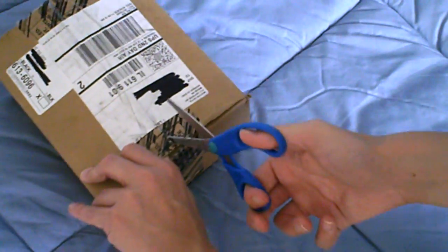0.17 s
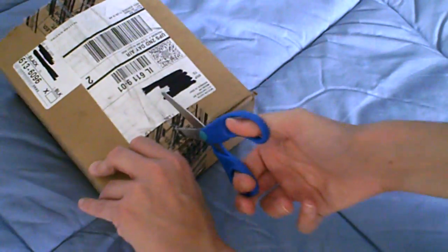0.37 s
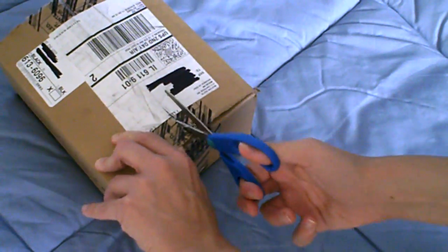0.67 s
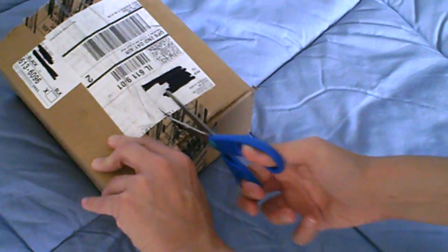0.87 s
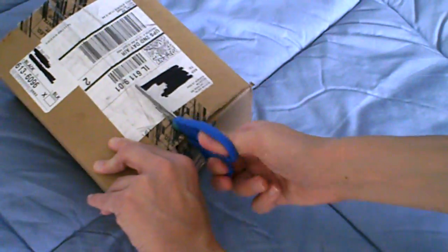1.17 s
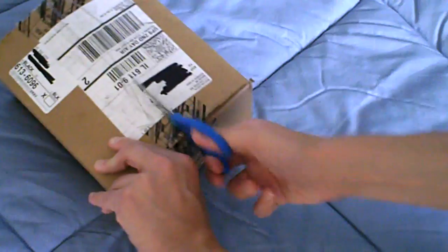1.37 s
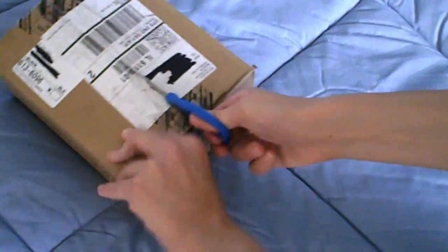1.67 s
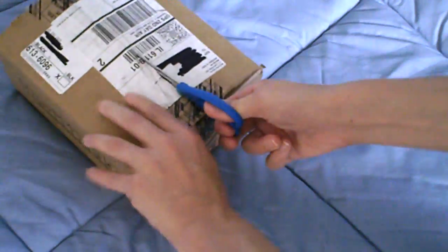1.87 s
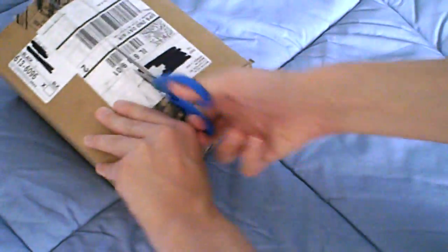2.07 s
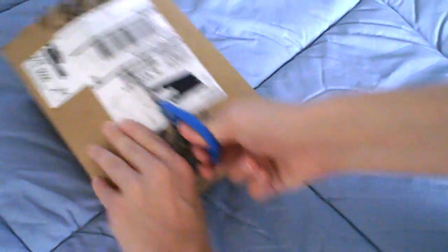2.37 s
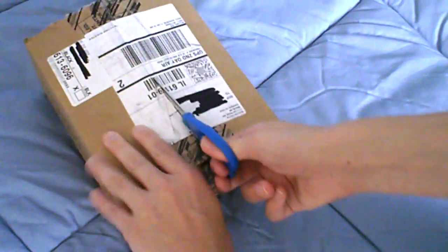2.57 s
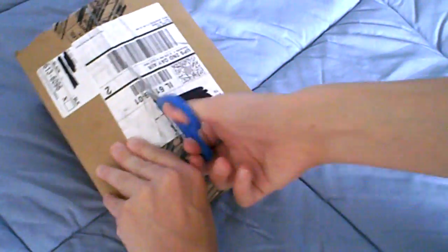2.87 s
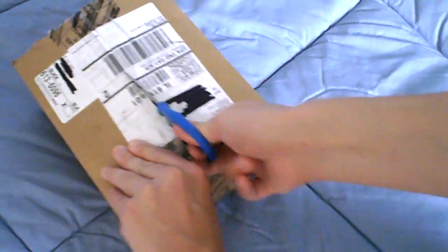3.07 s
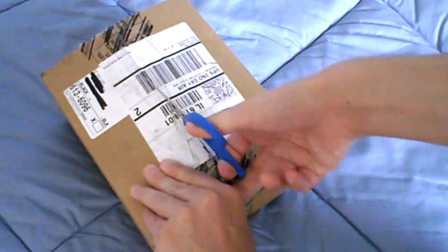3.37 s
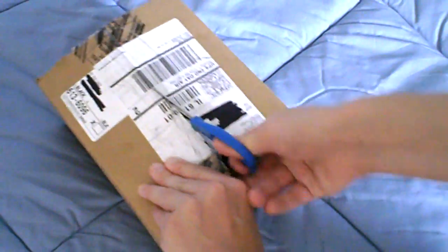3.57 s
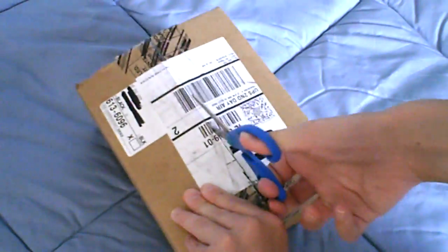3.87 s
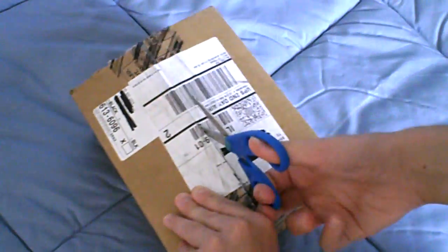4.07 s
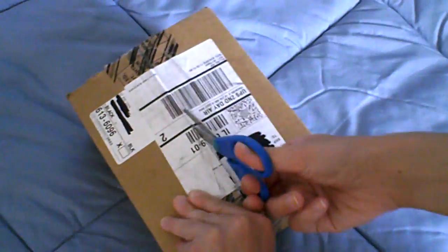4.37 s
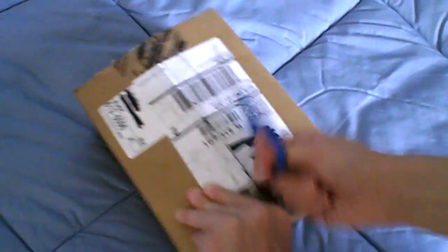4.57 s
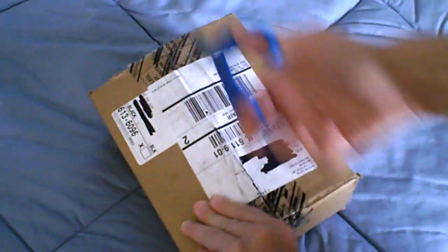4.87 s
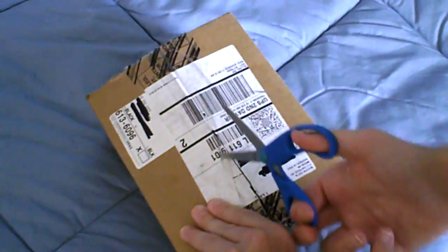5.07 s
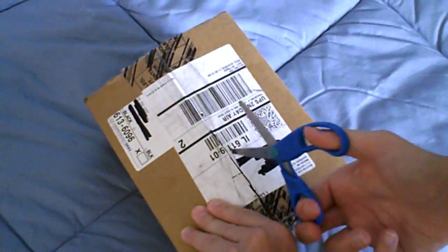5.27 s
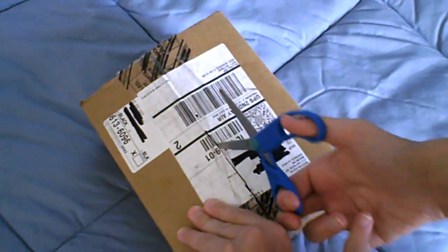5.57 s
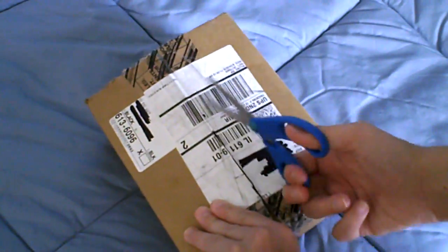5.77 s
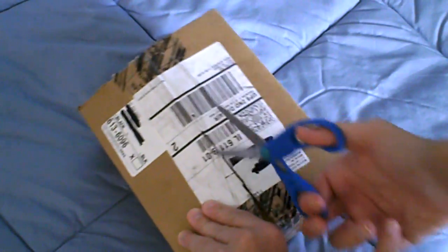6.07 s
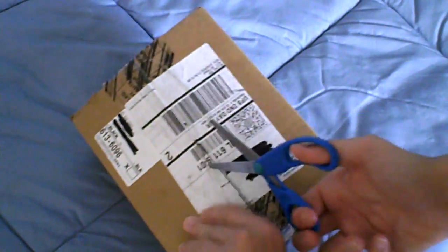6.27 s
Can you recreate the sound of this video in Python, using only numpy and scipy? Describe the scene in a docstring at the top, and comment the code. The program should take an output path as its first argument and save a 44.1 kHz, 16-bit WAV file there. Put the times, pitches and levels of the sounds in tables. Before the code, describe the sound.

Close, uneven cutting at a cardboard box: short gritty pushes, crackling tape, hollow thumps, a sharp blade crunch, then sparse light scrapes.

```python
"""Scraping, crunching and hissing pushes with snaps and hollow knocks: scissors cut packing tape on a box.
The box lies on a bed in a small room. Random slips, filtered, make the rubbing, the tearing and the grating
blades; filtered bursts make the snaps, clinks, bumps and creak; swells of noise make the blades shear.
All of it rings the modes of the hollow box and the room, over a faint steady rush."""
import sys
import numpy as np
from scipy import signal
from scipy.fft import rfft, irfft, next_fast_len
from scipy.io import wavfile
from scipy.ndimage import uniform_filter1d, map_coordinates

SR = 44100
rng = np.random.default_rng(int(sys.argv[2]) if len(sys.argv) > 2 else 0)


def transcribe(u):
    """Save the signal u as a 16-bit wav file named by the first command-line argument.

    u: samples, shape (n,) or (channels, n), limited to [-1, 1]; the rate is SR.
    q: integer samples, one column per channel.
    """
    v = np.clip(np.atleast_2d(u).T, -1, 1)
    q = np.round(v * 32767).astype(np.int16)
    wavfile.write(sys.argv[1], SR, q)


N = 283254
TIME = np.arange(N) / SR  # the whole scene [s]
AGE = np.arange(SR // 2) / SR  # half a second from the onset of a sound [s]


def amp(db):
    """Decibels to gain."""
    return 10 ** (np.asarray(db) / 20)


def unit(x):
    """Scale to rms 1."""
    return x / np.sqrt(np.mean(x ** 2) + 1e-20)


def along(points, hz):
    """Read (Hz, value) points on a log frequency axis."""
    point_hz, value = np.transpose(points)
    return np.interp(np.log(hz + 1), np.log(point_hz), value)


def causal(gain_at, size=4096):
    """Minimum-phase impulse response with the given gain over frequency: its energy comes as early as possible."""
    log_gain = np.log(np.maximum(gain_at(np.fft.rfftfreq(size, 1 / SR)), 1e-6))
    cepstrum = irfft(log_gain)
    # fold the cepstrum onto positive time
    cepstrum[1:size // 2] *= 2
    cepstrum[size // 2 + 1:] = 0
    return irfft(np.exp(rfft(cepstrum)))


def through(x, response):
    """Convolve, keeping the length."""
    return signal.oaconvolve(x, response)[:len(x)]


def colour(points):
    """Impulse response of a (Hz, dB) spectrum."""
    return causal(lambda hz: amp(along(points, hz)))


def coloured(x, points):
    """Filter x through a (Hz, dB) spectrum."""
    return through(x, colour(points))


def resonance(centre_hz, q, order=1):
    """Impulse response of a broad resonance; a higher order steepens its skirts."""
    def gain_at(hz):
        detuning = (hz + 1) / centre_hz - centre_hz / (hz + 1)
        return (1 + (q * detuning) ** 2) ** (-order / 2)
    return causal(gain_at)


def ringing(modes):
    """Sum of damped modes, each (Hz, dB, t60 s), scaled to total energy 1."""
    ring = sum(amp(db - 60 * AGE / t60) * np.cos(2 * np.pi * hz * AGE) for hz, db, t60 in modes)
    return ring / np.linalg.norm(ring)


def add(track, s, sound):
    """Mix a sound in at time s."""
    start = max(round(s * SR), 0)
    track[start:start + len(sound)] += sound[:N - start]


def friction(per_second, spread_db, smooth):
    """Dry friction: random slips of uneven size on a share of smooth rubbing noise, rms 1."""
    happens = rng.random(N) < per_second / SR
    sign = rng.choice([-1, 1], N)
    size = amp(spread_db * np.minimum(rng.standard_normal(N), 2))
    slips = happens * sign * size
    return unit(unit(slips) + smooth * rng.standard_normal(N))


def burst(response, scatter, t60):
    """One release trailed by decaying noise, as of tearing fibres, through a response; rms 1 over 5 ms."""
    t = AGE[:len(response)]
    push = rng.standard_normal(len(t)) * amp(-60 * t / t60)
    push *= scatter / np.linalg.norm(push)
    push[0] += 1  # the release itself
    sound = through(push, response)
    return sound * np.sqrt(.005 * SR) / np.linalg.norm(sound)


def swell(s, spread_s):
    """A bell-shaped rise and fall around time s."""
    return np.exp(-.5 * ((TIME - s) / spread_s) ** 2)


def wobble(rate):
    """A smooth random curve with rate knots a second."""
    return map_coordinates(rng.standard_normal(int(N * rate / SR) + 4), [TIME * rate])


def effort(start, length, growth_db):
    """Gain of one push: it builds up, holds while the force grows or eases, and dies away."""
    attack_share, release_db_per_s = 0.24, 223
    age = TIME - start
    attack = np.sin(np.pi / 2 * np.clip(age / (attack_share * length), 0, 1))
    growth = growth_db * (np.clip(age / length, 0, 1) - .5)
    release = release_db_per_s * np.maximum(age - length, 0)
    return attack * amp(growth - release)


def contact(depth):
    """Gains of rubbing, crunch and hiss: a deeper blade shakes the box more and hisses less."""
    rub_db = -5 + 15 * depth
    hiss_db = -2.5 - 11 * depth
    return amp([[rub_db], [0], [hiss_db]])


def stroke():
    """With each push the blade rubs the card, crushes fibres and hisses along the tape."""
    # pushes of the blade: (start [s], length [s], level [dB], growth over the push [dB],
    # depth [0 skims the tape .. 1 digs into the card])
    pushes = [(0, 0.075, -69, -4, 0.64), (0.299, 0.14, -69.5, 8, 0.34), (0.45, 0.17, -66.5, -4, 0.36),
              (0.59, 0.069, -63.5, -1, 0.48), (0.739, 0.046, -60.5, 0, 0.27), (0.906, 0.055, -63.5, 6, .7),
              (0.955, 0.067, -60.5, 2, 0.13), (1.016, 0.16, -57, -4.5, 0.2),
              (1.172, 0.14, -58.5, 1.5, 0.57), (1.397, 0.074, -59, 2.5, 0.32),
              (1.499, 0.072, -56, 6.5, 0.36), (1.59, 0.072, -53, 0, 0.57), (1.718, 0.18, -66, -3, 0.16),
              (1.936, 0.14, -61, 0, 0.22), (2.085, 0.061, -64, -0.5, 0.77), (2.165, 0.062, -63, -2, 0.72),
              (2.258, 0.21, -58.5, -1, 0.62), (2.548, 0.11, -62.5, -4, .3), (2.685, 0.13, -61.5, 5, 0.52),
              (2.827, 0.098, -57.5, 3.5, 0.45), (2.956, .1, -58, 5, 0.55), (3.076, 0.057, -64, 8.5, 0.62),
              (3.15, 0.15, -61.5, 0.5, .15), (3.263, 0.095, -61, 2, 0.62),
              (3.482, 0.052, -52.5, -4.5, 0.65), (3.637, 0.24, -61.5, 6.5, 0.23),
              (3.89, .12, -68, 11, 0.52), (4.09, .14, -70.5, 9.5, 0.76), (4.255, 0.13, -63, -5, 0.59),
              (4.455, .19, -58, 5, 0.58), (4.678, 0.067, -58, -0.5, 0.28), (5.05, 0.22, -73.5, 0, 0.75),
              (5.301, 0.033, -64.5, -6, 0.96), (5.391, 0.063, -71.5, 3, 0.84),
              (5.488, 0.038, -65.5, 1, 0.74), (5.739, 0.059, -60.5, -3.5, .55),
              (6.052, 0.033, -65, 1, 0.74), (6.1, 0.29, -67, 6, 0.63), (6.355, 0.081, -60.5, 5, .75)]
    # spectrum of the box rubbed by the blade: (frequency [Hz], level [dB])
    rub_colour = [(40, -34), (90, -32.5), (135, -16), (200, -8.5), (290, -3), (390, -2), (560, 1.5),
                  (780, -1.5), (1150, 1.5), (1500, -13), (2500, -17), (6000, -62.5)]
    # spectrum of crushed fibres: (frequency [Hz], level [dB])
    fibre_colour = [(600, -72), (1200, -1), (1700, 6.5), (2300, 1), (3200, 0.5), (5000, -1), (7000, -14),
                    (14000, -51)]
    # spectrum of the blade sliding along the tape: (frequency [Hz], level [dB])
    slide_colour = [(2500, -28), (4500, -5), (5600, 0), (6500, -2), (7900, 0), (10200, -2), (12000, -11),
                    (16000, -25)]
    rest_db, rest_depth = -77.5, 0.68  # between pushes the hands and the blade never lie quite still
    tremor_db, tremor_per_s = 0.92, 25  # the force of the hand is unsteady

    power = (amp(rest_db) * contact(rest_depth)) ** 2
    for start, length, db, growth_db, depth in pushes:
        peak = amp(db) * contact(depth)
        power = power + peak ** 2 * effort(start, length, growth_db) ** 2
    rub_gain, crunch_gain, hiss_gain = np.sqrt(power) * amp(tremor_db * wobble(tremor_per_s))

    # now and then a stiffer fibre holds, then cracks through card and tape alike
    catches = friction(per_second=60, spread_db=0.5, smooth=0)
    rubbing = friction(per_second=350, spread_db=3.5, smooth=0.57)
    tearing = friction(per_second=900, spread_db=1.5, smooth=1.07)
    sliding = friction(per_second=4000, spread_db=7.5, smooth=0.83)
    rub = rub_gain * unit(coloured(rubbing + 0.17 * catches, rub_colour))
    crunch = amp(-3.5) * crunch_gain * unit(coloured(tearing + 0.59 * catches, fibre_colour))
    hiss = hiss_gain * unit(coloured(sliding + 0.25 * tearing + 0.18 * catches, slide_colour))
    return rub + crunch + hiss


def shifting(x, depth_db):
    """The colour wanders as the point of contact moves: smooth random gains over time and frequency."""
    spectrum = signal.stft(x, nperseg=512)[2]
    field = rng.standard_normal(spectrum.shape)
    field = uniform_filter1d(field, size=5, axis=0)  # across frequency
    field = uniform_filter1d(field, size=16, axis=1)  # across time
    return signal.istft(spectrum * amp(depth_db * unit(field)), nperseg=512)[1][:N]


def box_ring(blows, rubbing):
    """The modes of the hollow box ring, more for blows than for rubbing."""
    # modes of the hollow box: (frequency [Hz], level [dB], t60 [s])
    box_modes = [(133, -17, 0.33), (190.7, -2.5, 0.28), (301, -2.5, 0.1), (440, -14, 0.3), (504, -3, 0.12),
                 (571.6, -0.5, 0.24), (601, 6, 0.065), (672, -4, .2), (730, -11, .3), (770, -19, .17),
                 (943, -2, 0.29), (1106, -3, 0.13), (1114, -8, 0.09), (1300, 0, .15)]
    lift_s, set_down_s, lifted_db = 4.9, 6.2, -12  # scissors lifted clear: they ring the box less
    touching = amp(lifted_db * ((TIME > lift_s) & (TIME < set_down_s)))
    drive = amp(-22.0) * blows + amp(-26) * rubbing
    return through(touching * drive, ringing(box_modes))


def room(x, count=8):
    """Near walls answer with decaying noise; the echo pattern shifts as the hands and the box move."""
    # decay of the small room: (frequency [Hz], t60 [s])
    room_decay = [(150, 0.15), (600, 0.39), (2000, 0.16), (6000, 0.16), (14000, 0.079)]
    wet = np.zeros(N)
    for s in np.linspace(0, N / SR, count):
        hz, t, z = signal.stft(rng.standard_normal(len(AGE)), SR, nperseg=256)
        decay = amp(-60 * t / along(room_decay, hz)[:, None])
        tail = signal.istft(z * decay, SR, nperseg=256)[1][:len(AGE)]
        tail *= 1 - np.exp(-(AGE / 0.0043) ** 2)  # the echo builds up over a few ms
        # each tail crossfades into the next
        share = np.sqrt(np.maximum(1 - np.abs(TIME - s) * (count - 1) * SR / N, 0))
        wet += through(x * share, tail / np.linalg.norm(tail))
    return wet


def steady_rush():
    """A faint steady rush: coloured noise."""
    # spectrum of the rush: (frequency [Hz], level [dB])
    rush_colour = [(20, -29), (65, -29), (100, -18), (200, -4), (400, 2), (800, -4.5), (1500, -4.5),
                   (3000, -8.5), (8000, -16.5), (12000, -23), (16000, -25.5)]
    return amp(-68.5) * unit(coloured(rng.standard_normal(N), rush_colour))


def snaps():
    """Each snap cracks and ticks in the tape, knocks the lid and pushes the air in the box."""
    # tape and card giving way: (time [s], knock on the lid [dB], knock pitch [Hz],
    # crack in the tape [dB], crack pitch [Hz])
    snap_events = [(.038, -51.5, 1000, -67, 2200), (0.1032, -53, 900, -75, 2400),
                   (.4931, -58, 800, -70, 2160), (.617, -53, 1100, -47.5, 4000),
                   (0.7477, -58, 980, -64, 4700), (1.0277, -52, 670, -59.5, 4600),
                   (1.2052, -38.5, 590, -57, 3500), (1.2242, -43.5, 1070, -44.5, 3100),
                   (1.2629, -45, 555, -57, 3500), (1.2964, -49, 590, -53.5, 3600),
                   (1.4055, -70, 560, -57.5, 4470), (1.4371, -51.5, 615, -60, 4250),
                   (1.5188, -48, 647, -64, 2600), (1.53, -44.5, 700, -66, 2800),
                   (1.5846, -33.5, 583, -56, 2930), (1.6217, -44, 626, -58, 3800),
                   (1.9566, -54.5, 860, -48.5, 7750), (2.1676, -48, 640, -56.5, 3600),
                   (2.2181, -53, 615, -61, 3000), (2.2277, -51, 660, -62.5, 4800),
                   (2.2732, -52, 710, -46, 2090), (2.2835, -37, 615, -55, 3400),
                   (2.3264, -56, 730, -51, 1980), (2.3362, -43.5, 870, -56, 3800),
                   (2.3521, -46, 660, -64, 2300), (2.4106, -51, 1070, -61, 3700),
                   (2.5095, -51, 905, -72, 2600), (2.6328, -54, 660, -60, 3800),
                   (2.7579, -53.5, 646, -49, 2170), (2.8103, -51, 1060, -52, 4860),
                   (2.8495, -36.5, 600, -46.5, 3140), (2.8921, -41.5, 740, -52.5, 4000),
                   (2.9594, -40, 625, -50, 3940), (2.9764, -36, 696, -60, 3200),
                   (3.0169, -57, 740, -50, 5730), (3.1137, -43, 1033, -50.5, 2700),
                   (3.1758, -51, 720, -55, 4700), (3.255, -53.5, 750, -58, 2200),
                   (3.341, -57, 1020, -55, 3800), (3.4661, -40, 720, -48.5, 3020),
                   (3.469, -41.5, 500, -45.5, 2260), (3.511, -28, 653, -48.5, 3900),
                   (3.8221, -50, 750, -56.5, 2400), (3.9743, -53, 805, -57.5, 2500),
                   (4.1081, -52.5, 730, -59, 2800), (4.1533, -56, 1040, -57, 1900),
                   (4.2806, -54, 704, -60, 3000), (4.323, -44, 660, -54.5, 2700),
                   (4.3462, -40.5, 616, -51, 3140), (4.4786, -48, 1020, -54.5, 2300),
                   (4.621, -44.5, 990, -49, 4400), (4.7058, -47.5, 700, -48, 2480),
                   (4.72, -50, 840, -59, 2700), (5.0735, -43.5, 480, -60, 1910),
                   (5.1922, -50, 770, -66, 2680), (5.3102, -60, 600, -55.5, 2980),
                   (5.3221, -49.5, 930, -62, 2200), (5.4448, -55, 650, -65, 2800),
                   (5.4734, -66, 1000, -72, 6000), (6.046, -51, 760, -57.5, 1960),
                   (6.235, -52, 875, -58.5, 3130), (6.3918, -55, 895, -69, 3600)]
    # spectrum of the air in the box: (frequency [Hz], level [dB])
    thud_colour = [(40, -45), (90, -39), (135, -9), (195, -3.5), (290, 6.5), (400, -6.5), (800, -51)]
    # spectrum of the tick in the tape: (frequency [Hz], level [dB])
    tick_colour = [(3500, -60), (6500, -11), (8500, 13.5), (10000, 14), (12000, 5), (16000, -6)]
    track = np.zeros(N)
    thud, tick = colour(thud_colour), colour(tick_colour)
    for s, knock_db, knock_hz, crack_db, crack_hz in snap_events:
        thud_db = knock_db - 14
        tick_db = crack_db - 8.5 + 8.5 * np.log2(crack_hz / 3200)  # stronger in higher cracks
        knock = resonance(knock_hz, q=1.28, order=2)
        crack = resonance(crack_hz, q=0.78, order=3)
        add(track, s, amp(thud_db) * burst(thud, scatter=0.28, t60=0.086))
        add(track, s, amp(knock_db) * burst(knock, scatter=0.99, t60=0.03))
        add(track, s, amp(crack_db) * burst(crack, scatter=1.0, t60=0.014))
        add(track, s, amp(tick_db) * burst(tick, scatter=1.0, t60=0.0049))
    return track


def pivot():
    """A thin grating in one mode of the blades as they swing: slips through a narrow resonance."""
    # the blades grating past each other: (centre time [s], spread [s], frequency [Hz], level [dB])
    gratings = [(.42, .04, 7700, -74), (4.014, .06, 2760, -76), (4.74, .023, 2760, -73),
                (5.302, 0.038, 2800, -69), (5.424, .04, 2900, -78), (5.506, 0.011, 8550, -66),
                (6.08, .017, 2760, -72), (6.35, .09, 2760, -70)]
    slips = friction(per_second=1700, spread_db=14, smooth=0.93)
    track = np.zeros(N)
    for s, spread_s, hz, db in gratings:
        tone = unit(through(slips, resonance(hz, q=5.1, order=2)))
        track += amp(db) * swell(s, spread_s) * tone
    return track


def rips():
    """Tape lets go at once and crackles on for as long as the tear runs."""
    # short rips through the tape: (start [s], length [s], frequency [Hz], level [dB])
    tears = [(0.613, 0.024, 4500, -55), (1.268, 0.05, 2380, -59), (1.958, 0.033, 2780, -56),
             (2.326, 0.032, 2340, -51), (2.421, .028, 3200, -59), (2.848, .043, 5000, -62),
             (3.035, 0.025, 2960, -59), (3.12, .013, 2770, -64), (3.491, 0.023, 3860, -51),
             (6.05, 0.02, 2540, -65)]
    track = np.zeros(N)
    crackle = friction(per_second=710, spread_db=2.5, smooth=0.08)
    for s, length, hz, db in tears:
        run = crackle[round(s * SR):][:len(AGE)]
        fade = np.exp(-(AGE[:len(run)] / length) ** 4)
        response = resonance(hz, q=0.6, order=3)
        add(track, s, amp(db) * through(run * fade, response / np.linalg.norm(response)))
    return track


def shears():
    """Edge runs along edge in a swell of slips that shakes the card and rings the steel; the lid springs back."""
    # the blades biting through or closing: (time [s], spread [s], thud [dB], card [dB], scrape [dB], steel [dB])
    bites = [(0.641, 0.016, -85, -58.5, -51.5, -75), (1.872, 0.0083, -75, -54, -50, -77),
             (4.5612, 0.0036, -33.5, -28.5, -35, -40), (4.583, .005, -55, -44, -52, -64),
             (5.765, 0.0076, -56.5, -44.5, -46.5, -57.5)]
    # spectrum of the shaken card: (frequency [Hz], level [dB])
    card_colour = [(100, -40), (250, -12), (420, -12), (570, 0), (660, -6), (800, -1), (950, -2),
                   (1180, -2), (1550, -14), (2500, -28), (6000, -60)]
    # spectrum of edge scraping on edge: (frequency [Hz], level [dB])
    scrape_colour = [(500, -31), (1000, 11.5), (1300, 6), (1800, 2), (2500, 1.5), (4000, -10), (5500, -5.5),
                     (7000, -13), (9500, -13), (12000, -19), (16000, -54)]
    # modes of the steel blades, damped by the hand: (frequency [Hz], level [dB], t60 [s])
    steel_modes = [(1937, 4.5, 0.066), (2920, -35, 0.027), (3230, 2, 0.029), (5640, -15, 0.013),
                   (8320, 14.5, 0.0099), (8750, 11, 0.0094), (8500, -2, 0.014)]
    spring_back_s = 0.0067  # from the bite of the blades to the thud of the lid
    track = np.zeros(N)
    card, scrape, steel = colour(card_colour), colour(scrape_colour), ringing(steel_modes)
    lid = resonance(centre_hz=255, q=1.3, order=3)
    for s, spread_s, thud_db, card_db, scrape_db, steel_db in bites:
        pressure = np.exp(-.5 * (AGE / spread_s - np.pi) ** 2)  # peaks pi spreads after its start
        for response, db in [(card, card_db), (scrape, scrape_db), (steel, steel_db)]:
            sound = through(pressure * rng.standard_normal(len(AGE)), response)
            sound *= np.linalg.norm(pressure) / np.linalg.norm(sound)
            add(track, s - np.pi * spread_s, amp(db) * sound)
        add(track, s + spring_back_s, amp(thud_db) * burst(lid, scatter=0.19, t60=0.024))
    return track


def bumps():
    """Soft, low pushes of the box against the bedding: bursts through a low resonance."""
    # the box shifting on the bed: (time [s], frequency [Hz], level [dB])
    shifts = [(0.927, 300, -59), (1.2063, 244, -51), (1.2247, 270, -58), (1.5846, 262, -44),
              (2.284, 256, -48), (3.675, 85, -74), (3.716, 90, -69), (5.0739, 333, -59), (5.322, 192, -52),
              (5.904, 177, -64.5)]
    track = np.zeros(N)
    for s, hz, db in shifts:
        add(track, s, amp(db) * burst(resonance(hz, q=1.75, order=2), scatter=0.88, t60=0.05))
    return track


def groans():
    """The lid judders against the blade: quick slips keep its main resonance sounding."""
    # juddering of the lid: (centre time [s], spread [s], frequency [Hz], level [dB])
    judders = [(1.273, 0.015, 586, -49), (1.625, 0.035, 612, -46), (2.108, 0.011, 616, -54),
               (2.183, 0.0059, 630, -45), (2.21, 0.009, 630, -51), (3.006, 0.066, 604, -59.5),
               (4.327, 0.037, 556, -57.5)]
    slips = friction(per_second=530, spread_db=1, smooth=0.16)
    track = np.zeros(N)
    for s, spread_s, hz, db in judders:
        tone = unit(through(slips, resonance(hz, q=3.8, order=2)))
        track += amp(db) * swell(s, spread_s) * tone
    return track


def clinks():
    """Light taps of the blades, quickly damped by the hand."""
    # steel touching steel: (time [s], frequency [Hz], level [dB])
    taps = [(2.7577, 4940, -54), (3.5112, 5270, -44), (4.041, 9500, -69), (4.4283, 9200, -64),
            (4.6212, 8200, -49), (5.3102, 5030, -54), (5.473, 8900, -66), (6.2348, 4250, -61),
            (6.394, 6500, -67)]
    track = np.zeros(N)
    for s, hz, db in taps:
        add(track, s, amp(db) * burst(resonance(hz, q=7.5, order=2), scatter=1.0, t60=0.0029))
    return track


def creak():
    """The blade sticks and slips: a short run of nearly even slips that weaken as the tape relaxes."""
    # the run of slips: (start [s], rate [slips per s], count [slips], level of the first [dB])
    slip_run = (4.1706, 228, 5, -53.5)
    track = np.zeros(N)
    s, rate, slips, db = slip_run
    card = resonance(centre_hz=1300, q=1.1, order=3)
    tape = resonance(centre_hz=3600, q=.6, order=4)
    for k in range(round(slips)):
        slip = burst(card, scatter=.3, t60=.01) + .35 * burst(tape, scatter=.4, t60=.004)
        slip_s = s + (k + rng.normal(0, 0.073)) / rate
        add(track, slip_s, amp(db - .5 * k) * slip)
    return track


def scene():
    """Rubbing and blows sound directly, ring the box and echo in the room over the steady rush."""
    rubbing = shifting(stroke(), depth_db=2.5) + pivot() + groans() + rips()
    blows = snaps() + creak() + shears() + clinks() + bumps()
    direct = rubbing + blows + box_ring(blows, rubbing)
    mix = direct + amp(-12) * room(direct) + steady_rush()
    return mix[None]  # one channel


def record(dry):
    """Cut away everything above the band limit."""
    top_hz = 16100
    size = next_fast_len(N + SR // 2)
    kept = np.fft.rfftfreq(size, 1 / SR) < top_hz
    return irfft(rfft(dry, size) * kept, size)[:, :N]


dry = scene()
out = record(dry)
transcribe(out)
```